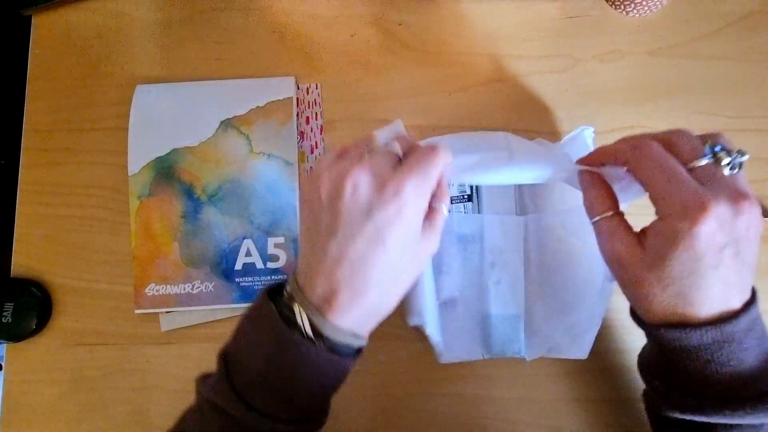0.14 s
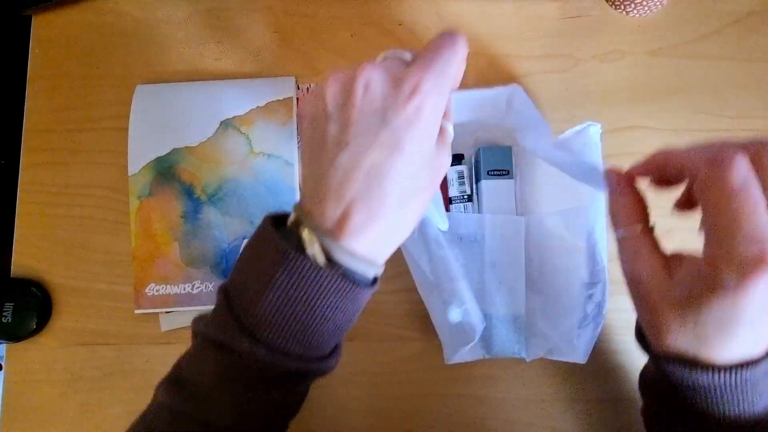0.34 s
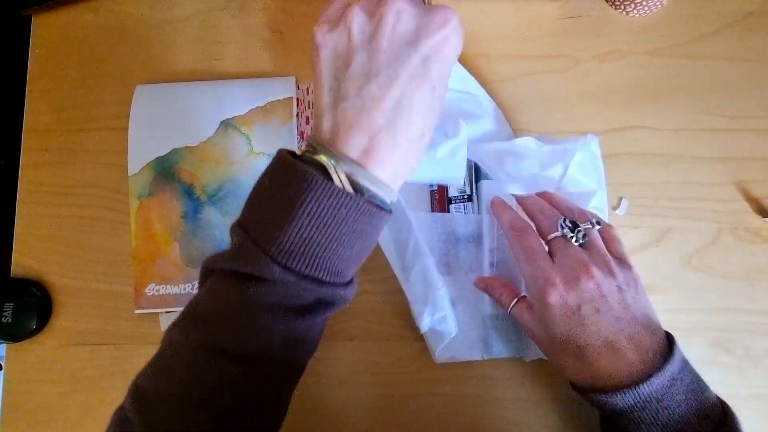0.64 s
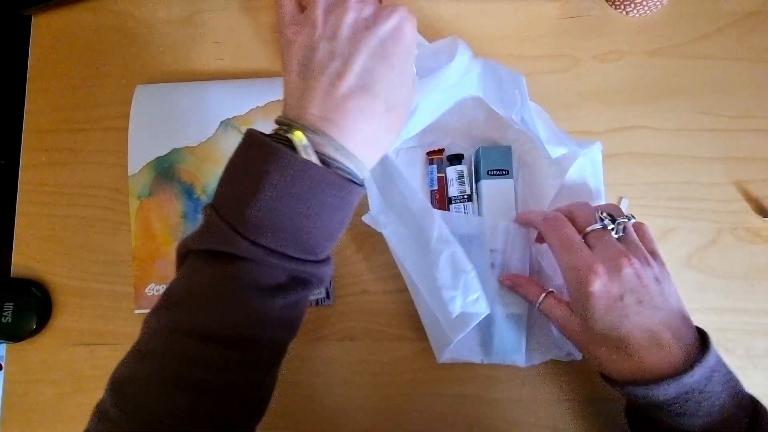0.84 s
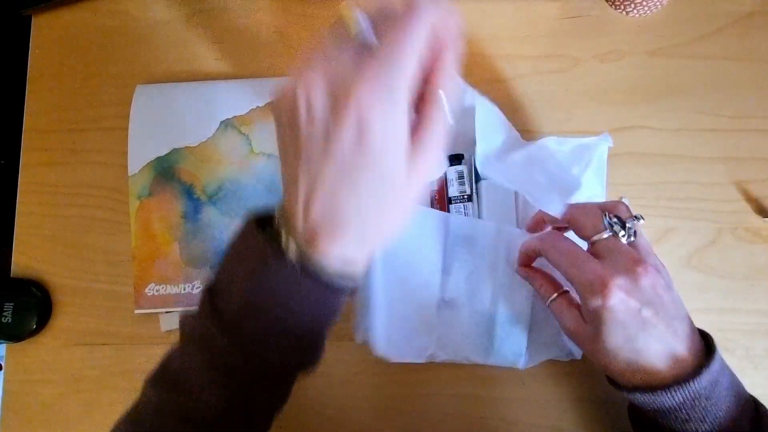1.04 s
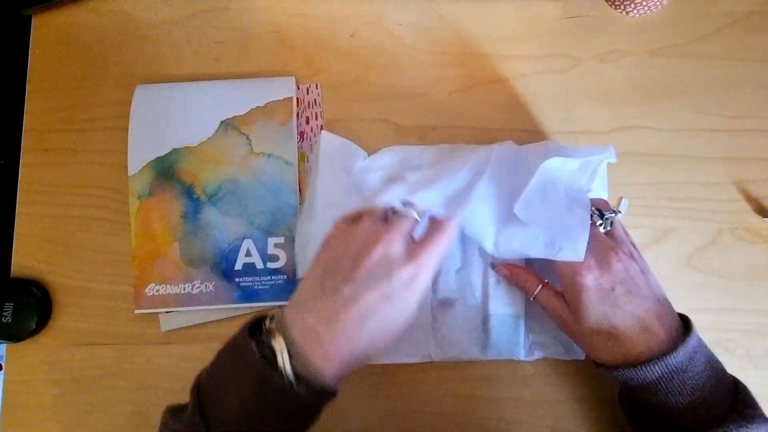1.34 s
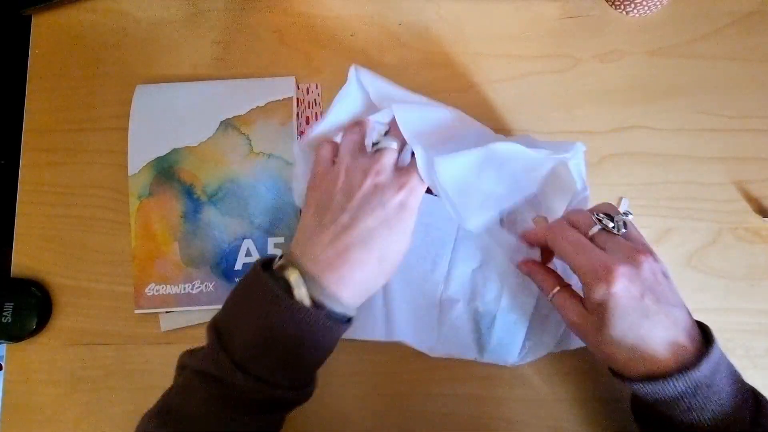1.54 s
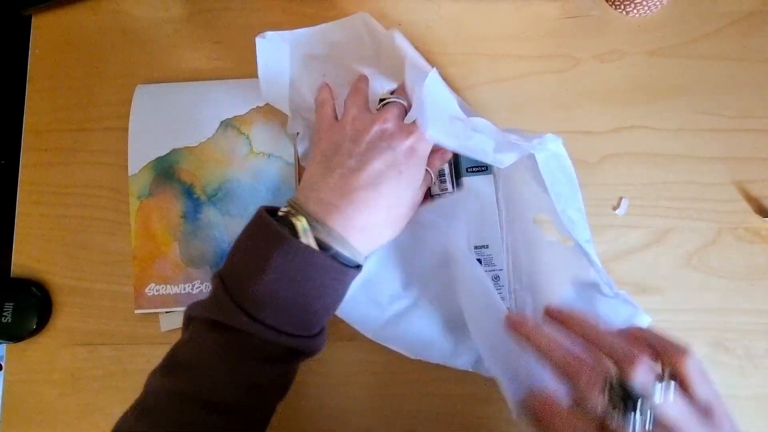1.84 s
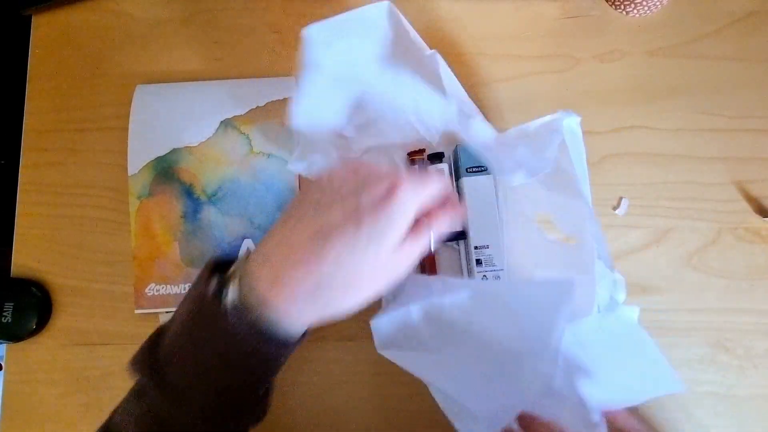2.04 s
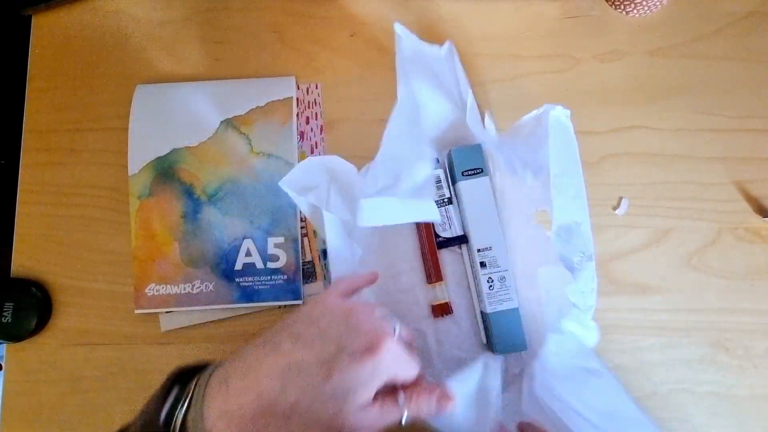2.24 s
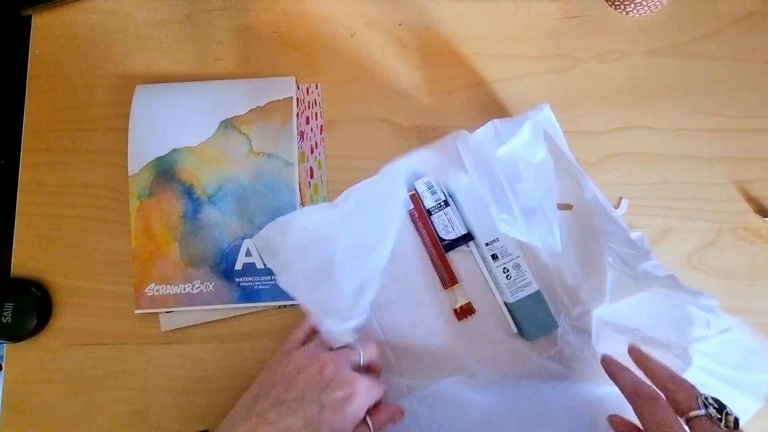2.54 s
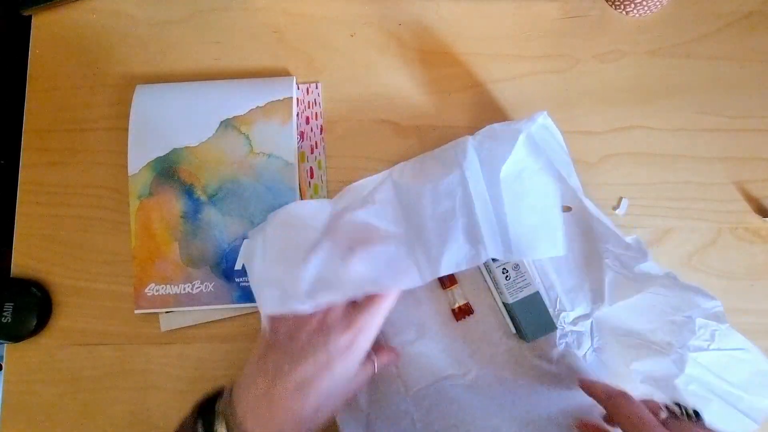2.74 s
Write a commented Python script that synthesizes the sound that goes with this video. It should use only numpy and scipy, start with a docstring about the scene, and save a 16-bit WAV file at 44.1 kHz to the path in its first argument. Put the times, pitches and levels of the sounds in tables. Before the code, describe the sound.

Close stereo pickup of tissue paper being unfolded on a wooden table: light crinkles, a cluster of crisp snaps, a short near-pause, then fuller rustling with soft scrapes and dull thuds in a dry room.

```python
"""Unfolding tissue paper

Two hands unfold thin tissue on a wooden table, close under a stereo pair of microphones.
Creases buckle as trains of coloured noise grains, with single snaps, popping folds and tinted rustle.
The sheet scrapes dully over paper and wood; damped modes make the table top hum and ring when knocked.
Air puffs low from the sheet; a short nearby room and a quiet noise floor lie behind it all."""
import sys
import numpy as np
from scipy import signal
from scipy.fft import rfft, irfft, next_fast_len
from scipy.io import wavfile
from scipy.ndimage import uniform_filter1d

SR = 44100
rng = np.random.default_rng(int(sys.argv[2]) if len(sys.argv) > 2 else 0)


def voltage_ratio(level):
    """Linear amplitude factor for a level in decibels (scalar or array-like)."""
    return 10 ** (np.asarray(level, float) / 20)


def generate_wav(sig):
    """Save sig (samples, or channels by samples) to the path in sys.argv[1] as 16-bit PCM at SR."""
    pcm = np.round(np.clip(np.atleast_2d(sig).T, -1, 1) * 32767).astype(np.int16)
    wavfile.write(sys.argv[1], SR, pcm)


N = 127890  # samples, 2.9 s

# Levels are those of each dry source, ahead of the low cut and the lean to one side.
# Crackle of buckling creases: time_s, level_db
CRACKLE = [(0.0, -36.5), (0.05, -45), (0.08, -39), (0.18, -35), (0.18, -38), (0.28, -41.5), (0.29, -36.5),
           (0.52, -43.5), (0.545, -53), (0.61, -39.5), (0.67, -38.5), (0.68, -35), (0.81, -36), (0.9, -31),
           (0.98, -38), (1.11, -34.5), (1.14, -41), (1.15, -60), (1.19, -38), (1.2, -47), (1.245, -50.5),
           (1.262, -61), (1.3, -53), (1.35, -62.5), (1.41, -34), (1.45, -43.5), (1.47, -33), (1.57, -29.5),
           (1.58, -32.5), (1.67, -31), (1.77, -39), (1.85, -34), (1.86, -36), (1.94, -36.5), (1.96, -31.5),
           (2.06, -36), (2.18, -35), (2.24, -38.5), (2.25, -39.5), (2.27, -39), (2.38, -29), (2.4, -33.5),
           (2.51, -38), (2.52, -34), (2.59, -26.5), (2.61, -30), (2.66, -28.5), (2.67, -33), (2.75, -29.5),
           (2.76, -28), (2.79, -27), (2.82, -37), (2.9, -37.5)]
# Duller scrape of paper on paper and wood: time_s, level_db
SCRAPE = [(0.0, -54), (0.17, -43), (0.28, -51), (0.29, -46.5), (0.44, -49), (0.55, -57.5), (0.58, -49),
          (0.67, -47.5), (0.68, -40.5), (0.81, -48), (0.9, -41), (0.95, -49.5), (1.11, -49.5),
          (1.22, -57.5), (1.36, -61.5), (1.41, -40.5), (1.43, -54), (1.49, -38.5), (1.57, -39),
          (1.58, -43.5), (1.65, -41), (1.88, -48), (1.91, -41.5), (1.94, -45.5), (1.95, -40), (2.08, -43),
          (2.16, -42.5), (2.3, -45), (2.4, -41), (2.5, -45), (2.58, -42), (2.65, -46.5), (2.76, -48.5),
          (2.78, -48.5), (2.83, -57), (2.9, -54)]
# Moving hands: time_s, table_hum_db, pushed_air_db
HANDS = [(0.0, -52.5, -82), (0.06, -57.5, -78), (0.44, -54.5, -86), (0.89, -52, -73), (1.36, -58, -85),
         (1.46, -52, -58), (1.53, -46, -75), (1.61, -52.5, -68), (1.74, -51.5, -81), (2.06, -53.5, -65),
         (2.12, -55.5, -77), (2.45, -52, -55), (2.5, -58, -68), (2.58, -47.5, -55.5), (2.63, -46.5, -64),
         (2.74, -53, -78), (2.79, -47, -52), (2.9, -54.5, -69)]
# Creases snapping: start_s, level_db (before SNAP_TRIM_DB), brightest_hz, fall_s (time constant)
SNAPS = [(0.0744, -37, 2600, 0.0025), (0.108, -26, 5000, 0.0028), (0.16, -21, 13600, 0.0024),
         (0.171, -17.5, 5400, 0.0013), (0.2377, -25, 3370, 0.0019), (0.2886, -21.5, 9100, 0.0016),
         (0.309, -31, 12500, 0.002), (0.3232, -40, 14600, 0.0012), (0.5596, -26.5, 9680, 0.0017),
         (0.5797, -22.5, 5030, 0.001), (0.604, -19.5, 13500, 0.00096), (0.631, -18.5, 14500, 0.0012),
         (0.6742, -17, 7190, 0.0032), (0.687, -15.5, 13700, 0.0026), (0.7001, -16, 10100, 0.0025),
         (0.724, -15, 14500, 0.002), (0.744, -20, 14400, 0.00068), (0.7568, -12.5, 12300, 0.00089),
         (0.7735, -18, 7000, 0.0005), (0.787, -18, 8000, 0.0012), (0.7907, -20, 9190, 0.0024),
         (0.819, -21, 9000, 0.00076), (0.8453, -19, 4800, 0.0012), (0.907, -28, 2860, 0.004),
         (1.131, -19, 3320, 0.0021), (1.176, -31, 4430, 0.0018), (1.2235, -32, 7000, 0.0012),
         (1.234, -26, 9000, 0.00076), (1.2398, -32, 8000, 0.00062), (1.2739, -29, 12300, 0.0014),
         (1.301, -37, 3030, 0.003), (1.313, -35, 8000, 0.0012), (1.329, -39, 6330, 0.0018),
         (1.344, -36, 10000, 0.002), (1.356, -35, 12600, 0.0017), (1.37, -32.5, 5500, 0.0022),
         (1.3841, -27, 12500, 0.0026), (1.4047, -27, 9050, 0.0018), (1.464, -16, 14400, 0.0021),
         (1.4946, -14, 12500, 0.0024), (1.5642, -21, 14800, 0.0014), (1.7871, -17.5, 13100, 0.002),
         (1.8398, -22, 4700, 0.0018), (1.9134, -22, 14600, 0.0022), (1.958, -18, 12900, 0.004),
         (2.0217, -20.5, 5860, 0.0027), (2.2508, -17, 12200, 0.0018), (2.3509, -20.5, 5080, 0.0014),
         (2.3825, -21, 6130, 0.002), (2.4666, -19, 4780, 0.002), (2.522, -17, 14600, 0.0018),
         (2.5411, -18, 13000, 0.0041), (2.5813, -17, 2960, 0.0029), (2.5893, -17, 13600, 0.0036),
         (2.6249, -25, 6500, 0.0026), (2.7063, -21, 5000, 0.0018), (2.7612, -18.5, 9220, 0.0034)]
# Folds popping with a short note: start_s, level_db, centre_pitch_hz
POPS = [(0.105, -35, 2300), (0.262, -39, 1770), (.309, -38, 890), (.905, -37, 990), (1.041, -40.5, 1260),
        (1.131, -32.5, 3246), (2.14, -37, 1210), (2.579, -33, 3000)]
# Tinted rustle, noise focused around one pitch: start_s, length_s, level_db, pitch_hz
TINTS = [(0.054, 0.14, -45.5, 2810), (1.474, 0.13, -43, 1190), (1.59, 0.16, -50.5, 1140),
         (2.531, 0.075, -44, 820)]
# Knocks on the table: start_s, level_db (before the mode and thud trims), thud_pitch_hz
KNOCKS = [(0.004, -42.5, 152), (0.7, -33.5, 212), (0.902, -34.5, 287), (1.448, -29.5, 166),
          (2.775, -23, 179.4)]
# Partials of the knock's thud: pitch_multiple (ratio), level_db (before THUD_DB)
THUD_PARTIALS = [(1, 5), (1.5, -4.5), (2, -8.5), (2.8, -4)]
# Modes of the table top: pitch_hz, knock_db (before KNOCK_MODES_DB), t60_s, hum_db (relative)
TABLE_MODES = [(127.1, -1.5, 1, -6.5), (149.9, -9, 0.32, -7), (187.2, -10, 0.3, -2.5),
               (215, -3.5, 0.093, -9), (259.3, 0.5, 0.14, -8), (338, -7.5, 0.091, -21),
               (503, -19, 0.068, -10), (847, -38, 0.1, -7)]
# Bright spectrum of the paper: frequency_hz, gain_db (relative)
PAPER_COLOUR = [(880, -10.5), (1500, -7.5), (2400, -5), (3300, 2), (7000, 3.5), (11200, 2.5), (14200, 5.5),
                (16500, -2)]
# Dull spectrum of the scrape on wood: frequency_hz, gain_db (relative)
WOOD_COLOUR = [(150, -22), (250, -2), (305, -11), (496, -6.5), (668, -9.5), (1190, -2.5), (2200, -5),
               (3500, -3.5), (4550, -17.5), (7700, -120)]
# Spectrum of the quiet background: frequency_hz, gain_db (relative)
FLOOR_COLOUR = [(20, -28), (70, -44), (125, 5), (300, -9.5), (520, -15), (2300, -13), (6000, -10),
                (16000, -28)]
# Likeness of the two microphones: frequency_hz, correlation (0 to 1)
LIKENESS = [(30, 0.72), (120, 0.98), (250, 0.7), (500, 0.84), (1000, 0.86), (2000, 0.22), (4000, 0.012),
            (15000, 0.03)]

GRAIN_SPREAD_DB, CLUMP_DB = 2, 0.5
BUSY_DB, SPARSEST = -38, 0.12  # a gentler hand buckles fewer creases, down to this share
NEEDLE_DB = -11.5  # sharp ticks relative to the crackle
SNAP_TRIM_DB, SNAP_RISE_SHARE, SNAP_FOCUS_DB, SNAP_BODY_DB = -9, 0.84, 4.5, -15.5
TINT_FOCUS_DB = 24
POP_T60_S, POP_RISE_S, POP_SPREAD = 0.033, 0.0015, 0.12  # spread is a share of the pitch
KNOCK_MODES_DB, PUSH_S = -12.5, 0.0019
THUD_DB, THUD_T60_S = -7.5, 0.066
ROOM_DB, ROOM_T60_S = -8, 0.12
FLOOR_DB = -60.5
LOW_CUT_HZ, EDGE_HZ = 114.4, 15800
LEAN_DB = -0.57  # left relative to right


def evened(x):
    """Scales to rms 1."""
    return x / np.sqrt(np.mean(x ** 2) + 1e-20)


def curve(table, column=1):
    """Gain over time from a dB column."""
    rows = np.array(table)
    return voltage_ratio(np.interp(np.arange(N) / SR, rows[:, 0], rows[:, column]))


def read(points, hz):
    """Reads a table on a log-frequency axis."""
    f, value = np.transpose(points)
    return np.interp(np.log(hz + 1), np.log(f + 1), value)


def add(mix, s, sound):
    """Mixes a sound in at s seconds."""
    part = mix[:, max(round(s * SR), 0):][:, :sound.shape[-1]]
    part += sound[..., :part.shape[1]]


def pair(size, colour, focus_hz=1000, focus_db=0):
    """Coloured noise at the two microphones, with one brighter region and their likeness."""
    hz = np.fft.rfftfreq(size, 1 / SR)
    left, other = rfft(rng.standard_normal((2, size)))
    same = np.clip(read(LIKENESS, hz), -1, 1)
    right = same * left + np.sqrt(1 - same ** 2) * other
    focus = focus_db * np.exp(-(np.log((hz + 1) / focus_hz) / 0.27) ** 2)
    gain = voltage_ratio(read(colour, hz) + focus)
    return evened(irfft(gain * np.array([left, right]), size))


def burst(size, rise_s, fall_s):
    """Soft start, exponential fall, peak 1."""
    t = np.arange(size) / SR
    shape = (1 - np.exp(-t / rise_s)) ** 2 * np.exp(-t / fall_s)
    return shape / shape.max()


def grains(clump, colour, busy, per_s, lengths_s, lo_hz, hi_hz, count):
    """Many small bucklings: short coloured bursts, each kind on its own random train, in clumps."""
    height = voltage_ratio(GRAIN_SPREAD_DB * np.minimum(rng.exponential(1, N), 4))
    struck = rng.random(N) < busy * per_s / SR
    hit = clump / np.sqrt(busy) * height * struck  # sparser grains are stronger
    kind = rng.integers(0, count, N)
    out = np.zeros((2, N))
    for k, hz in enumerate(np.geomspace(lo_hz, hi_hz, count)):
        fall = rng.uniform(*lengths_s)
        decay = burst(2048, fall / 3, fall) ** 2 / fall
        power = signal.oaconvolve((hit * (kind == k)) ** 2, decay)[:N]
        noise = pair(next_fast_len(N), colour, hz, 9.7)[:, :N]
        out += np.sqrt(abs(power)) * noise
    return evened(out)


def crackle(clump):
    """Creases buckle in dense bright grains, with sparse sharp ticks among them."""
    level = curve(CRACKLE)
    busy = np.clip(level / voltage_ratio(BUSY_DB), SPARSEST, 1)
    dense = grains(clump, PAPER_COLOUR, busy, 1500, (0.0015, 0.0049), 2020, 15000, count=10)
    needles = grains(clump, PAPER_COLOUR, 1, 110, (0.000065, 0.00072), 4070, 25000, count=3)
    return level * (dense + voltage_ratio(NEEDLE_DB) * needles)


def scrape(clump):
    """Paper catches on paper and wood in many duller grains."""
    return curve(SCRAPE) * grains(clump, WOOD_COLOUR, 0.97, 900, (0.0024, 0.0045), 341, 2820, count=6)


def snaps():
    """Single creases let go in a bright noise burst with a little dull body."""
    out = np.zeros((2, N))
    for s, db, hz, fall_s in SNAPS:
        bright = pair(2048, PAPER_COLOUR, hz, SNAP_FOCUS_DB)
        body = voltage_ratio(SNAP_BODY_DB) * pair(2048, WOOD_COLOUR)
        shape = burst(2048, SNAP_RISE_SHARE * fall_s, fall_s)
        add(out, s, voltage_ratio(db + SNAP_TRIM_DB) * (bright + body) * shape)
    return out


def tinted_rustle():
    """Tinted rustle: noise focused around one pitch, swelling and fading."""
    out = np.zeros((2, N))
    for s, length, db, hz in TINTS:
        swell = signal.windows.tukey(round(length * SR), 0.5)
        noise = pair(8192, WOOD_COLOUR, hz, TINT_FOCUS_DB)[:, :len(swell)]
        add(out, s, voltage_ratio(db) * swell * evened(noise))
    return out


def pops():
    """Folds pop with a short note of three detuned sines, phased differently at each microphone."""
    out = np.zeros((2, N))
    t = np.arange(4096) / SR
    shape = burst(4096, POP_RISE_S, POP_T60_S / np.log(1000))
    for s, db, hz in POPS:
        pop = np.zeros((2, 4096))
        for detune, *phases in rng.uniform(-0.98, 1, (3, 3)):
            pitch = hz * (1 + POP_SPREAD * detune)
            pop += np.sin(2 * np.pi * pitch * t + np.array(phases)[:, None]) / 2
        add(out, s, voltage_ratio(db) * shape * pop)
    return out


def paper():
    """Crackle and scrape share their clumps; the clearest snaps and pops stand out."""
    drift = uniform_filter1d(uniform_filter1d(rng.standard_normal(N), 500), 500)
    clump = voltage_ratio(CLUMP_DB * evened(drift))
    return crackle(clump) + scrape(clump) + snaps() + tinted_rustle() + pops()


def mode_rings():
    """Each mode of the table top as a decaying sine, one second long."""
    t = np.arange(SR) / SR
    return [voltage_ratio(-60 * t / t60) * np.sin(2 * np.pi * hz * t) for hz, _, t60, _ in TABLE_MODES]


def table_hum(rings):
    """Moving hands keep the board humming: flat noise rings through its modes."""
    hum = sum(voltage_ratio(row[3]) * ring / np.linalg.norm(ring) for row, ring in zip(TABLE_MODES, rings))
    drive = pair(N + SR, [(20, 0), (20000, 0)])
    return curve(HANDS) * evened(signal.fftconvolve(drive, hum[None], "valid", axes=1)[:, :N])


def table_knocks(rings):
    """Each dull knock sets the modes ringing beside a short thud of sine partials."""
    out = np.zeros((2, N))
    t = np.arange(SR) / SR
    board = sum(voltage_ratio(row[1] + KNOCK_MODES_DB) * ring for row, ring in zip(TABLE_MODES, rings))
    thud_fall = voltage_ratio(THUD_DB - 60 * t / THUD_T60_S)
    for s, db, hz in KNOCKS:
        thud = thud_fall * sum(voltage_ratio(d) * np.sin(2 * np.pi * k * hz * t) for k, d in THUD_PARTIALS)
        push = np.minimum(t / PUSH_S, 1)
        add(out, s, -voltage_ratio(db) * push * (board + thud)[None])
    return out


def table():
    """The board's modes hum under the moving hands and ring after each knock."""
    rings = mode_rings()
    return table_hum(rings) + table_knocks(rings)


def air():
    """Low puffs of air from the moving sheet, as deep noise."""
    deep = [(15, -20), (30, 0), (62, 18), (95, 8), (130, -40), (20000, -100)]  # Hz, dB
    return curve(HANDS, column=2) * pair(N, deep)


def room(x):
    """A short tail of nearby reflections: random-sign echoes with an exponential fall."""
    t = np.arange(8192) / SR
    echoes = rng.choice([-1., 1.], (2, 8192)) * (rng.random((2, 8192)) < 0.08)
    tail = echoes * voltage_ratio(-60 * t / ROOM_T60_S) * (t > 0.002)
    tail /= np.linalg.norm(tail, axis=1, keepdims=True)
    return voltage_ratio(ROOM_DB) * signal.fftconvolve(x, tail, axes=1)[:, :N]


def background():
    """Quiet steady noise behind the table."""
    return voltage_ratio(FLOOR_DB) * pair(N, FLOOR_COLOUR)


def scene():
    """Paper in the room and the table radiate little deep bass; then air and background."""
    sheet = paper()
    cut = signal.butter(4, LOW_CUT_HZ, "high", fs=SR, output="sos")
    near = signal.sosfilt(cut, sheet + room(sheet) + table())
    return near + air() + background()


def band_limit(x):
    """A steep low-pass at the top of the band."""
    return signal.sosfilt(signal.butter(12, 16720, fs=SR, output="sos"), x)


def record(dry):
    """The microphone pair leans slightly to the right and the top of the band is cut."""
    edge = signal.firwin(511, EDGE_HZ, window=("kaiser", 9), fs=SR)
    leaned = dry * voltage_ratio(np.array([[LEAN_DB / 2], [-LEAN_DB / 2]]))
    mix = signal.oaconvolve(leaned, edge[None], "same", axes=1)
    return band_limit(mix)


dry = scene()
out = record(dry)
generate_wav(out)
```